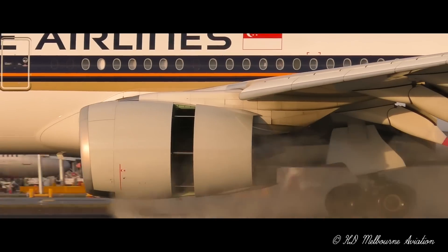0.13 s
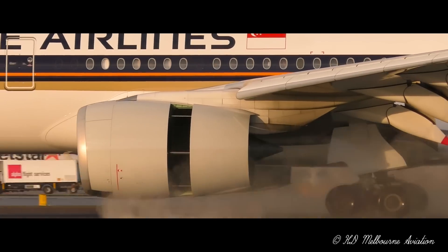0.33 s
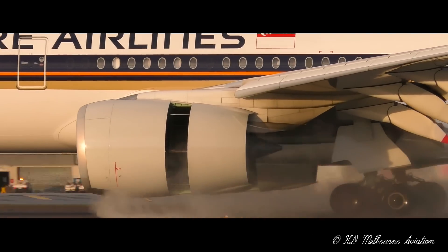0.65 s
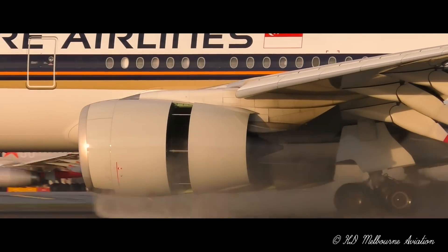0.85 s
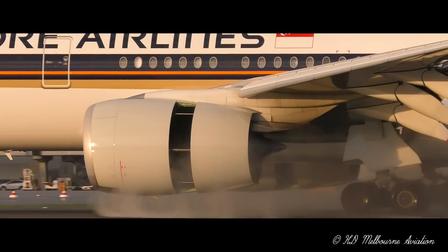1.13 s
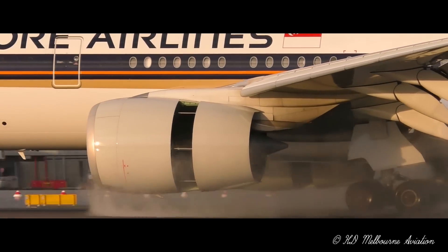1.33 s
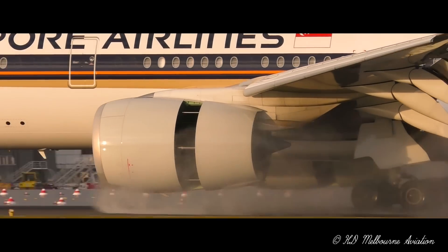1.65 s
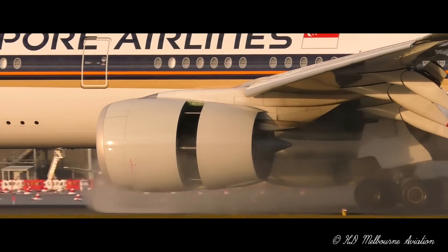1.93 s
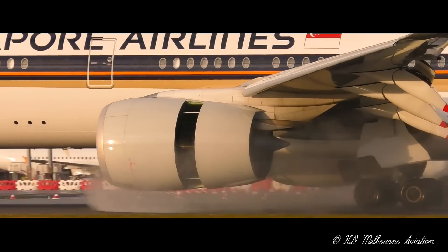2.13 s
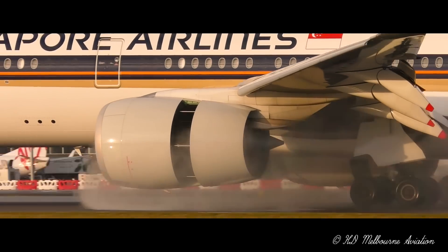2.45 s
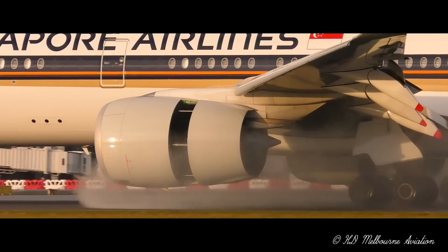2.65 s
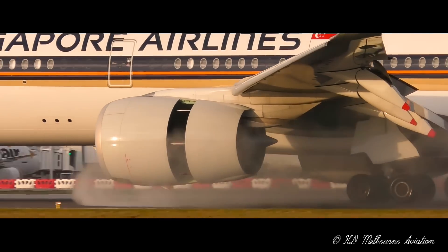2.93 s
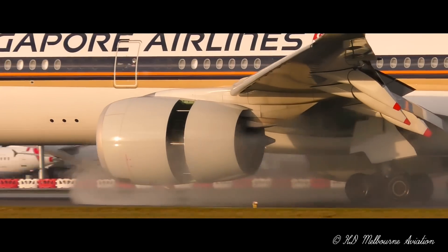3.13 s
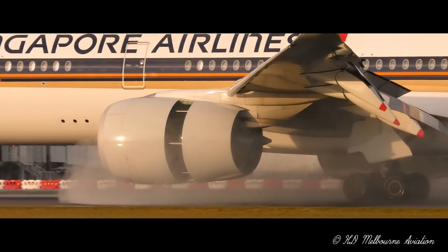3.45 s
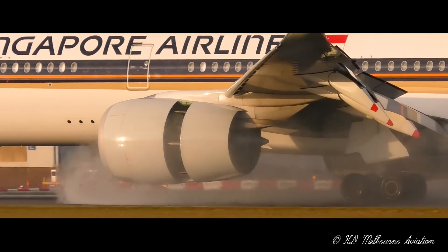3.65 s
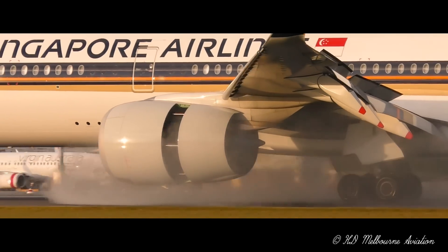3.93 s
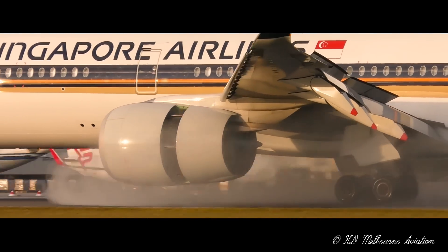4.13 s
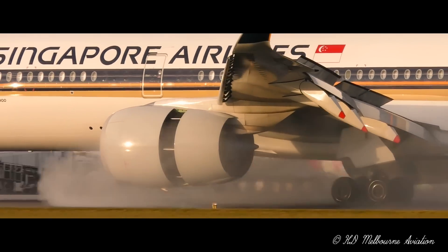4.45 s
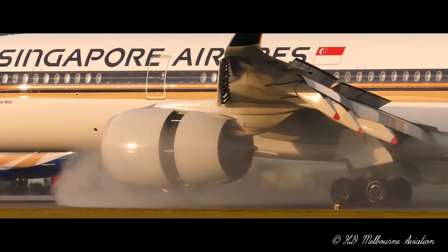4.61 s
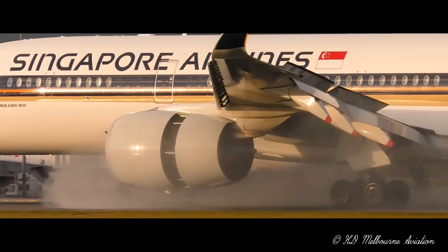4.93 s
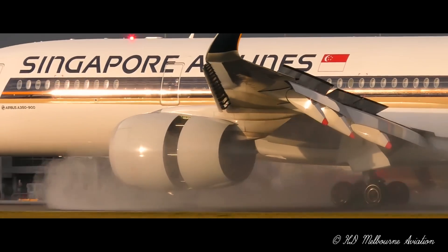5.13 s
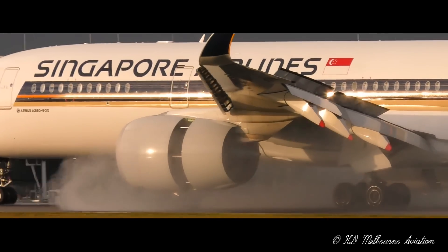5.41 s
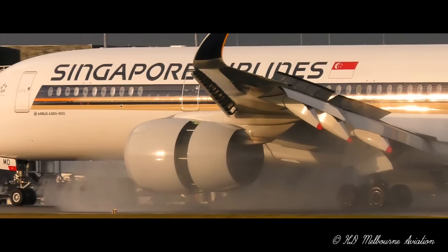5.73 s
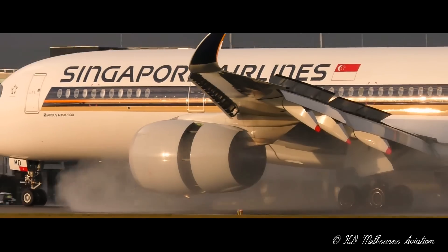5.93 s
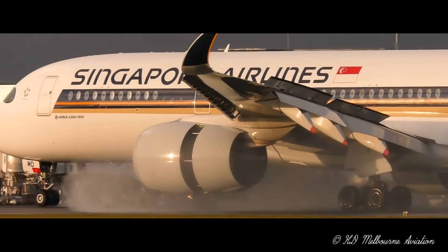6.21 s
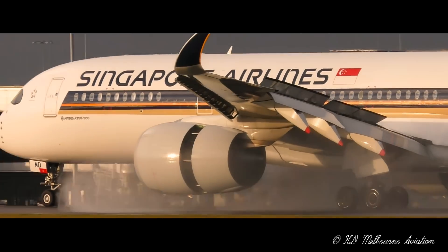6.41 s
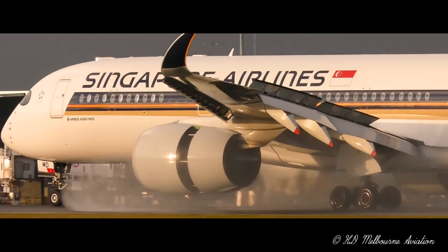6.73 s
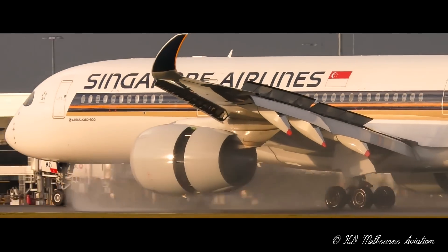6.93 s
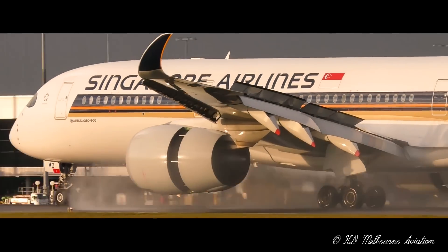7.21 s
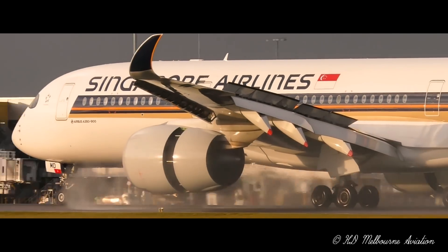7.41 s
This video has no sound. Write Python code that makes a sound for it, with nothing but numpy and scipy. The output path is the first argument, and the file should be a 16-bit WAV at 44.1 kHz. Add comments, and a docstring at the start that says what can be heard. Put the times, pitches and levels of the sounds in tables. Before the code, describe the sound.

A distant airliner rolls along a wet runway with its engines in reverse thrust, already sounding at 0 s and continuing to the end at about 7.5 s. A heavy low rumble with deep throbs and growling churn surges unevenly several times a second. Over it lies a broad, airy mid roar and a softer hiss of blown water, both modest at first, lifting slightly around 0.5 and 1.5 s, with a gust near 2.5 s. Between 3 and 4.5 s a faint, blurry fan tone around the low-mid range emerges in brief flares, sinking slightly in pitch, with weaker returns later. From 4.5 s the blast grows; strong gusts come near 5 and 6.2 s, the latter hissier. Roar stays strong while low churn and growl ease. A last spray gust near 7.4 s precedes a quick drop in hiss. Single distant outdoor microphone, muffled treble, fluttering air.

```python
"""An airliner rolls past on a wet runway with its fan engines in reverse thrust, heard from far away.
From the start the turned-round jets rumble and roar, and blown-up spray hisses: all are shaped noise.
A faint fan tone sinks as the aircraft passes, coming through the roar in short flares.
The sound swells and fades on its way; the roar and hiss grow stronger, and the hiss drops at the end.
Little treble survives the distance."""
import sys
import numpy as np
from scipy import signal
from scipy.fft import rfft, irfft
from scipy.io import wavfile

SR = 44100
rng = np.random.default_rng(int(sys.argv[2]) if len(sys.argv) > 2 else 0)


def dump(signal):
    """Clip the signal to [-1, 1] and save it as 16-bit WAV at the path in sys.argv[1]."""
    limited = np.clip(np.atleast_2d(signal).T, -1, 1)
    pcm = np.round(limited * 32767).astype(np.int16)
    wavfile.write(sys.argv[1], SR, pcm)


N = 333837
FRAME, HOP = 2048, 256  # length and spacing of the short slices of noise [samples]
TIME = np.arange(N) / SR
FRAME_S = np.arange(N // HOP + 10) * HOP / SR
BIN_HZ = np.fft.rfftfreq(FRAME, 1 / SR)


def gain_of(db):
    """Turns decibels into a factor."""
    return 10 ** (np.asarray(db) / 20)


def evened(x):
    """Scales a signal to an rms (average strength) of one."""
    return x / np.sqrt(np.mean(x ** 2) + 1e-20)


def curve(rows, axis):
    """Joins one column of a table of times by straight lines."""
    columns = np.transpose(rows)
    return np.interp(TIME, columns[0], columns[axis])


def bump(s, half_length_s, edge=2):
    """Rises smoothly to one and falls again around a moment; a higher edge is steeper, 2 is a bell curve."""
    return np.exp(-.5 * np.abs((TIME - s) / half_length_s) ** edge)


def colour(points):
    """Gives a spectrum in dB at every bin, joined on a log-frequency axis and silent beyond its ends."""
    hz, db = np.transpose(points)
    return np.interp(np.log(BIN_HZ + 1), np.log(hz + 1), db, left=-150, right=-150)


def wander(rate_hz):
    """Makes smooth chance movement of rms one, fading out above about the given rate."""
    hz = np.fft.rfftfreq(N, 1 / SR)
    spectrum = rfft(rng.standard_normal(N))
    return evened(irfft(spectrum * np.exp(-(hz / rate_hz) ** 2), N))


def patches(span_s, span_hz):
    """Makes a smooth random field over time and frequency, of rms one."""
    field = rng.standard_normal((len(FRAME_S), len(BIN_HZ)))
    over_time = np.fft.fftfreq(len(FRAME_S), HOP / SR)[:, None] * span_s
    over_bins = np.fft.rfftfreq(len(BIN_HZ), SR / FRAME) * span_hz
    blur = np.exp(-np.pi * (over_time ** 2 + over_bins ** 2))
    return evened(np.fft.irfft2(np.fft.rfft2(field) * blur, field.shape))


def turbulence(field_db):
    """Makes noise of rms one whose short-time spectrum follows the field."""
    real, imaginary = rng.standard_normal((2, len(FRAME_S), len(BIN_HZ)))
    spectra = (real + 1j * imaginary) * gain_of(field_db)
    noise = signal.istft(spectra.T, nperseg=FRAME, noverlap=FRAME - HOP)[1]
    return evened(noise[:N])


def steadied(x, span_s):
    """Takes the slow chance swings out of a noise, leaving its quick beating."""
    window = signal.windows.hann(int(span_s * SR) + 3)
    window_sum = signal.fftconvolve(np.ones(N), window, "same")
    power = signal.fftconvolve(x ** 2, window, "same") / window_sum
    return x / np.sqrt(power + 1e-9)


def plumes():
    """Large eddies throb, middling ones rumble, smaller ones churn and growl; each size has its own surges."""
    # spectra of the eddies, from large to small: (frequency [Hz], relative level per Hz [dB])
    throb_spectrum = [(5, -29), (11, -17), (22, -9), (32, -4.5), (45, -.5), (56, .5), (68, -5), (95, -26)]
    rumble_spectrum = [(40, -24), (56, -6), (66, 9.5), (87, 11), (108, 6), (120, -11), (140, -23),
                       (190, -34.5)]
    churn_spectrum = [(90, -20), (114, -0.5), (126, 1.5), (152, -4.5), (175, -9), (205, -12), (250, -26),
                      (320, -41.5)]
    growl_spectrum = [(165, -20.5), (205, 1), (250, -3.5), (320, -7), (420, -15), (700, -37)]
    # surges of each size, before the trims and changes below: (time [s], level [dB])
    throb_level = [(0.0, -20), (0.63, -17.5), (1.05, -20.5), (1.41, -12.5), (1.68, -23.5), (2.19, -16),
                   (2.28, -22), (2.79, -18), (3.03, -17), (3.57, -18.5), (3.72, -11), (3.84, -22),
                   (4.35, -23), (4.68, -17.5), (4.829, -29.5), (5.43, -19), (5.85, -31), (6.0, -14.5),
                   (6.33, -36), (6.93, -14.5), (7.11, -27), (7.56, -27)]
    rumble_level = [(0.0, -15), (0.3, -14.5), (0.39, -17), (0.51, -13), (0.6, -13.5), (1.11, -14),
                    (1.23, -19), (1.59, -14.5), (1.68, -19), (1.77, -12), (2.16, -15.5), (2.46, -14.5),
                    (2.61, -16.5), (2.79, -13), (2.88, -23.5), (3.27, -12), (3.39, -16.5), (3.51, -11),
                    (3.69, -14.5), (3.96, -13.5), (4.11, -17), (4.2, -11.5), (4.29, -18), (4.44, -14.5),
                    (4.59, -18), (4.71, -10.5), (5.1, -20.5), (5.37, -20), (5.55, -17.5), (5.91, -13),
                    (6.03, -21), (6.27, -14.5), (6.42, -23.5), (6.66, -14.5), (6.81, -18.5), (6.93, -16),
                    (7.32, -20.5), (7.56, -12.5)]
    churn_level = [(0.0, -20.5), (0.36, -15), (0.72, -16), (0.99, -16), (1.47, -19.5), (1.71, -14),
                   (1.83, -23.5), (2.25, -13.5), (2.82, -18.5), (2.94, -17), (3.42, -22), (4.02, -17.5),
                   (4.2, -24.5), (4.47, -16), (4.62, -23), (4.86, -15.5), (5.1, -23), (5.4, -21),
                   (5.73, -19), (6.03, -23.5), (6.18, -19.5), (6.33, -25), (6.45, -18), (6.66, -21),
                   (6.96, -26), (7.17, -22.5), (7.38, -26), (7.56, -23)]
    growl_level = [(0, -26.5), (.21, -26.5), (.6, -23), (.72, -24.5), (1.17, -23), (1.3, -25),
                   (1.38, -23.5), (1.53, -29), (1.95, -25.5), (2.07, -25), (2.49, -22), (2.58, -26.5),
                   (2.97, -25.5), (3.09, -29.5), (3.7, -25), (3.87, -25), (4.44, -25), (4.65, -24.5),
                   (5.16, -26.5), (5.55, -26), (6.3, -33), (6.54, -29), (7.05, -24), (7.35, -32),
                   (7.56, -36)]
    # very brief rises and dips in the level of the low rumble: (time [s], half length [s], gain [dB])
    brief_changes = [(0.717, 0.013, -8), (1.12, .016, 1), (1.41, 0.017, 2), (1.96, 0.016, -4),
                     (2.606, 0.016, -3.5), (3.262, 0.011, 3.5), (3.438, 0.0095, -5), (3.95, 0.013, 1),
                     (4.711, 0.014, -0.5), (4.944, 0.014, -3), (5.16, 0.014, 1), (5.364, .018, -4.5),
                     (5.906, 0.014, 2), (6.07, 0.016, -1), (6.798, .016, -1.5), (7.006, 0.015, -2.5),
                     (7.43, .02, 3)]
    lump_db, lump_rate_hz = 0.8, 14  # the eddies are shed in uneven lumps

    churn_field = colour(churn_spectrum) + 1.5 * patches(0.087, 46)
    growl_field = colour(growl_spectrum) + 1.5 * patches(0.18, 66)
    # each layer: spectrum over time, steadying span [s], trim [dB], surges
    layers = [
        (colour(throb_spectrum), 0.24, -4.0, throb_level),
        (colour(rumble_spectrum), 0.18, -2.5, rumble_level),
        (churn_field, 0.17, -2.5, churn_level),
        (growl_field, 0.2, -4.0, growl_level),
    ]
    mixed = np.zeros(N)
    for field_db, span_s, trim_db, level in layers:
        eddies = steadied(turbulence(field_db), span_s)
        surge_db = curve(level, axis=1) + lump_db * wander(lump_rate_hz)
        mixed += eddies * gain_of(trim_db + surge_db)
    change_db = sum(db * bump(s, length) for s, length, db in brief_changes)
    return gain_of(change_db) * mixed


def blast():
    """Reversed air roars and tears water off the runway; both surge with gusts and flutter together."""
    # spectra of the roaring air and the hissing spray: (frequency [Hz], relative level per Hz [dB])
    roar_spectrum = [(200, -19.5), (290, -8.5), (370, -9.5), (480, -3), (620, -0.5), (850, -2.5),
                     (1050, -0.5), (1450, -1), (1850, -4.5), (2400, -13.5), (3500, -33.5), (5500, -63.5)]
    spray_spectrum = [(700, -33), (1400, -9), (2000, 0.1), (2400, -1), (3200, 0), (3600, -3), (3850, -8.5),
                      (4200, -13.5), (4600, -20.5), (5200, -25.5), (6000, -35.5), (8000, -57)]
    # the blast grows as it turns towards the listener, before gusts and flutter:
    # (time [s], roar level [dB], hiss level [dB])
    approach = [(0, -31.5, -36), (.4, -30, -32.5), (.95, -30.5, -33), (1.55, -27.5, -30.5),
                (3.35, -28, -30.5), (4.5, -25.5, -27.5), (5.5, -23.5, -27), (6.9, -24, -27),
                (7.57, -24, -32.5)]
    # gusts carry the blast over, lulls hold it back:
    # (time [s], half length [s], roar gain [dB], hiss gain [dB])
    gusts = [(0.573, 0.06, 2.8, 2), (1.316, 0.13, 1, 0), (2.472, 0.12, 3.5, 1.2), (3.34, 0.059, -1.5, -1.4),
             (4.2, 0.086, 0, 1.5), (4.52, 0.086, -1.3, -2.5), (5.074, 0.16, 3, 3), (5.86, 0.19, 0.9, 1.5),
             (6.163, 0.17, 0.5, 3.5), (6.16, 0.064, 1, 3), (7.43, 0.12, -0.6, 5)]

    roar_db, spray_db = curve(approach, axis=1), curve(approach, axis=2)
    for s, length, roar_gain_db, spray_gain_db in gusts:
        gust = bump(s, length, edge=5.2)
        roar_db = roar_db + roar_gain_db * gust
        spray_db = spray_db + spray_gain_db * gust
    flutter_db = 0.38 * wander(rate_hz=72) + 0.25 * wander(rate_hz=5.8)  # unsteady air
    fading_db = 0.79 * patches(0.035, 500)  # paths through the air and off the ground add and cancel
    roar = turbulence(colour(roar_spectrum) + fading_db) * gain_of(roar_db)
    spray = turbulence(colour(spray_spectrum) + fading_db) * gain_of(spray_db)
    return (roar + spray) * gain_of(flutter_db)


def swells():
    """One register of the roar at a time briefly grows louder, sometimes sliding in pitch: bands of noise."""
    # brief swells of one register: (time [s], half length [s], centre [Hz], half width [octaves],
    # glide [octaves per s], level [dB])
    register_swells = [(0.411, 0.076, 520, 0.39, -0.5, -32), (1.15, 0.08, 452, 0.18, -1, -31.5),
                       (1.206, 0.045, 1050, .3, 0.5, -30.5), (1.38, 0.045, 1040, 0.3, 0, -28),
                       (2.55, 0.16, 540, .4, -0.5, -36), (2.942, .14, 850, 0.49, 1, -31.5),
                       (3.4, 0.69, 487, 0.32, -0.5, -36.5), (4.575, 0.13, 491, 0.21, 0.5, -32.5),
                       (4.963, 0.057, 1700, 0.67, 0, -26), (5.027, 0.054, 1140, 0.45, -2, -24.5),
                       (5.175, 0.065, 610, 0.23, -0.9, -25.5), (5.23, 0.078, 1550, 0.4, 1, -27.5),
                       (5.889, .13, 564, 0.42, 0.1, -27), (6.165, 0.085, 1710, 0.53, 0.5, -23.5),
                       (6.35, 0.4, 1470, 0.3, 0.34, -28), (7.03, 0.13, 620, 0.36, -0.5, -31)]

    octave = np.log2(np.fft.rfftfreq(N, 1 / SR) + 1)
    out = np.zeros(N)
    for s, length, hz, width, glide, db in register_swells:
        band = np.exp(-.5 * ((octave - np.log2(hz)) / width) ** 2)
        noise = evened(irfft(rfft(rng.standard_normal(N)) * band, N))
        # playing the noise faster or slower slides its pitch
        pace = 2 ** (glide * np.clip(TIME - s, -2 * length, 2 * length))
        sliding = np.interp(np.cumsum(pace) % N, np.arange(N), noise)
        out += sliding * gain_of(db) * bump(s, length)
    return out


def fan():
    """The blade-passing tone sinks by the Doppler effect, smeared into a narrow band by turbulence."""
    # moments when the tone comes through the roar: (time [s], half length [s], level [dB])
    fan_flares = [(3.03, 0.18, -38.5), (3.65, 0.058, -37), (4.04, 0.09, -33), (4.23, 0.044, -42),
                  (4.43, 0.064, -31), (5.14, 0.06, -36), (5.87, .04, -34), (6.426, 0.03, -31),
                  (7.0, 0.081, -39)]
    abeam_hz, beam_db = 612.5, -45  # pitch at the closest point, peak level of the sideways beam
    mach = .058  # aircraft speed over the speed of sound
    abeam_s, pass_s = 3.5, 3.7  # moment of closest approach, closest distance over speed
    beam_half_s, smear_hz = 1.6, 21  # half length of the beam's passing, rate of the smearing

    distance = np.hypot(TIME - abeam_s, pass_s)  # in seconds of travel
    heard_hz = abeam_hz / (1 + mach * (TIME - abeam_s) / distance)
    phase = 2 * np.pi * np.cumsum(heard_hz) / SR
    tone = wander(smear_hz) * np.cos(phase) + wander(smear_hz) * np.sin(phase)
    beam = gain_of(beam_db) * bump(abeam_s, beam_half_s)
    flares = sum(gain_of(db) * bump(s, length) for s, length, db in fan_flares)
    return (beam + flares) * steadied(tone, span_s=0.22)


def mist(level_db=-55):
    """The finest droplets fizz faintly above the spray, without its swelling."""
    # spectrum of the fizz: (frequency [Hz], relative level per Hz [dB])
    mist_spectrum = [(3500, -12.5), (4400, 0), (5200, -4.5), (6000, -8.5), (7000, -16), (8000, -23),
                     (8600, -33), (15000, -39.5)]
    return gain_of(level_db) * turbulence(colour(mist_spectrum) + 1.6 * patches(.05, 500))


def scene():
    """Adds all the sounds of the aircraft at one distant microphone."""
    return (plumes() + blast() + mist() + swells() + fan())[None]


def record(dry):
    """The recorder's band limit: a low-pass filter takes away the highest treble."""
    edge_hz = 15700
    low_pass = signal.firwin(511, edge_hz, window=("kaiser", 9), fs=SR)
    return signal.oaconvolve(dry, low_pass[None], "same")


dry = scene()
out = record(dry)
dump(out)
```